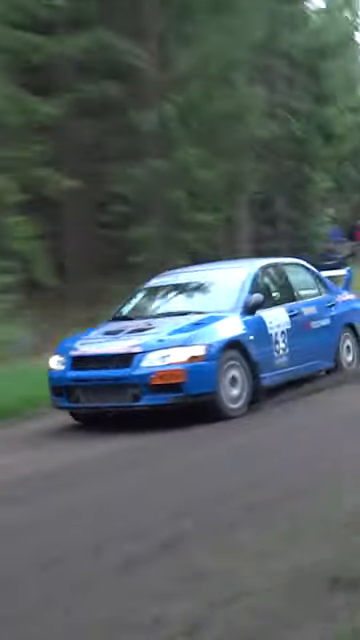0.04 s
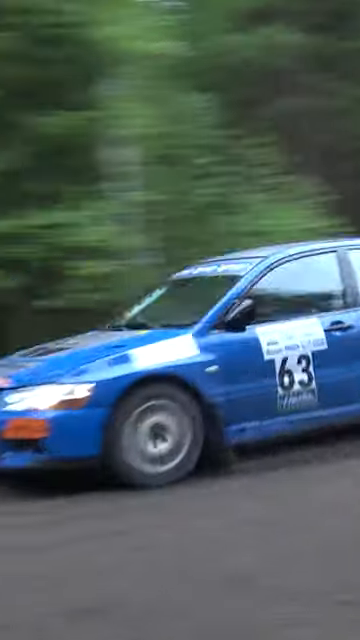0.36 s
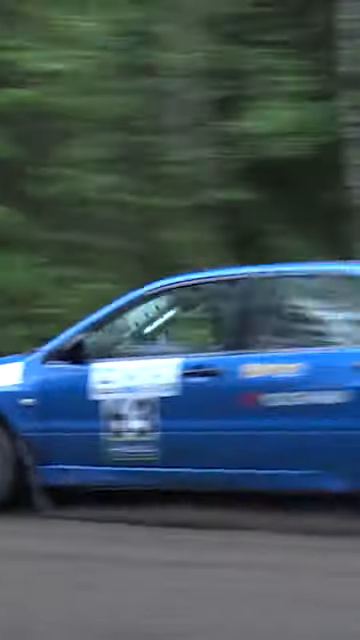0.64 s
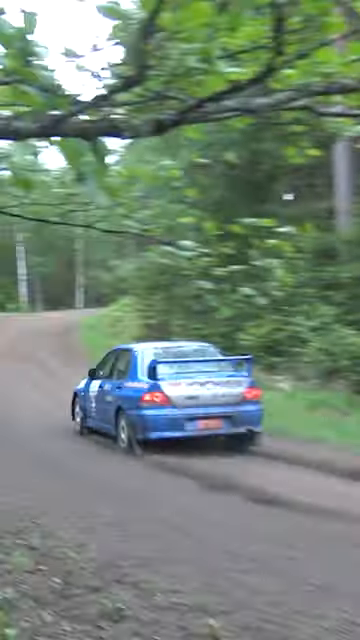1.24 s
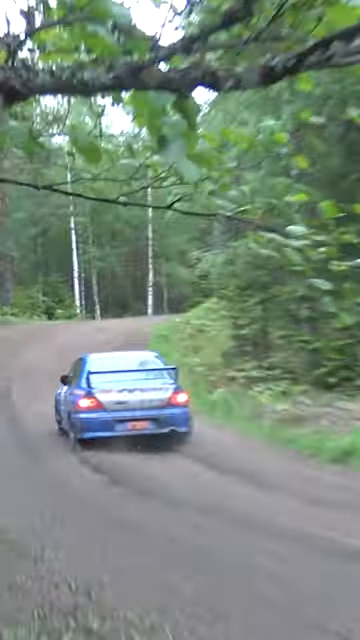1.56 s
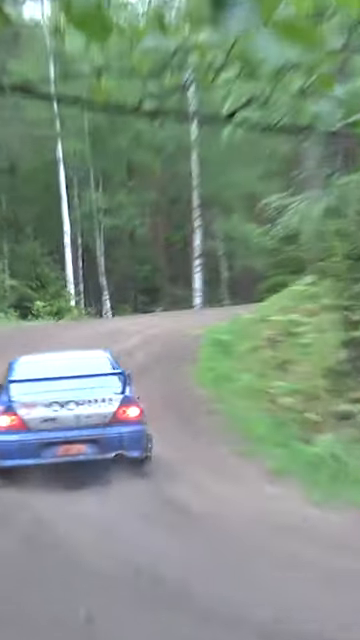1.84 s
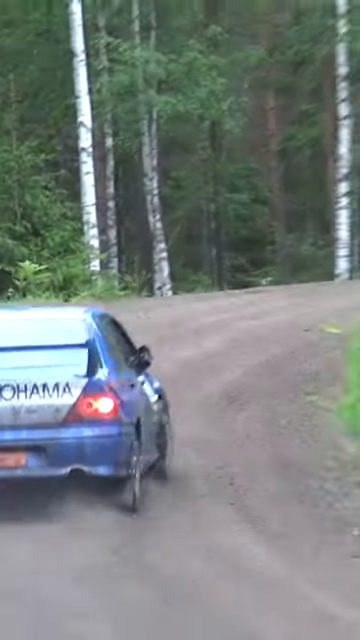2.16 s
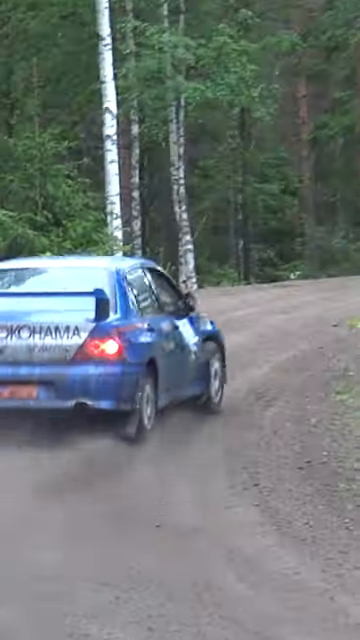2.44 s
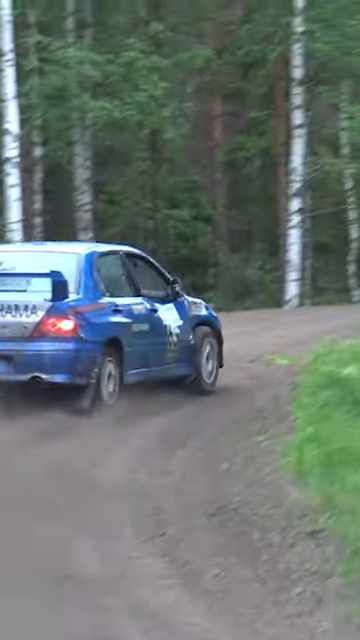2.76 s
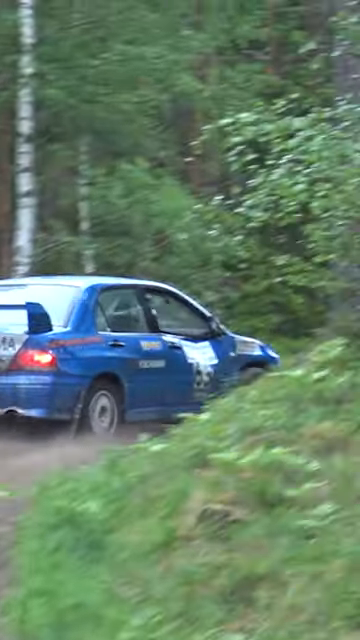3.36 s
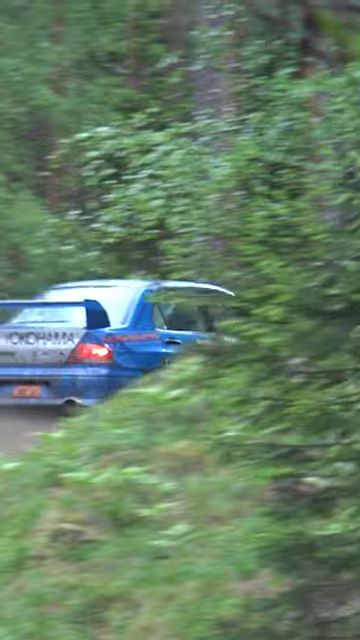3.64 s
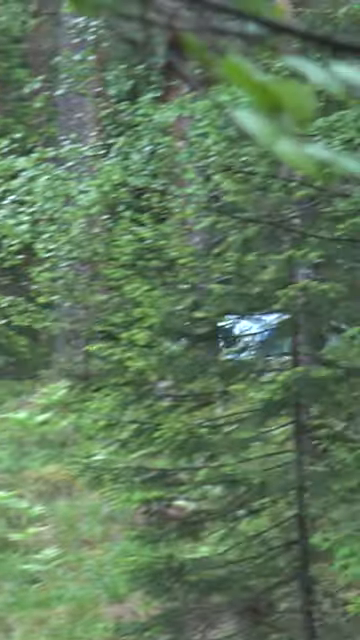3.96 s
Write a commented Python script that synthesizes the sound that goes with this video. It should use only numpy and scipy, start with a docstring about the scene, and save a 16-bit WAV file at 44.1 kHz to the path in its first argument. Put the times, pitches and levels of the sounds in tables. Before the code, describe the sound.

Close by on a forest gravel track, a turbocharged rally car growls past, hissing, chirping and spraying grit. It accelerates away, lifts for a bend with soft pops and tyre scrub, then powers on further off.

```python
"""A gravel forest road: a turbocharged four-cylinder rally car passes close, pulls away, lifts for a
bend and accelerates out. The engine bay is heard as it nears; once past, its firings ring the exhaust
pipe, which pops off throttle. The turbo whistles, blows off and chirps. Tyres crunch and spray gravel
and scrub in the bend, a few stones tick, and the trees give a short echo."""
import sys
import numpy as np
from scipy import signal
from scipy.fft import rfft, irfft
from scipy.io import wavfile
from scipy.ndimage import uniform_filter1d

SR = 44100
rng = np.random.default_rng(int(sys.argv[2]) if len(sys.argv) > 2 else 0)


def bounce(signal):
    """Save signal as a 16-bit WAV file at the path given by the first command-line argument."""
    frames = np.transpose(np.atleast_2d(signal))
    limited = np.clip(frames, -1, 1)
    pcm = np.round(limited * 32767).astype(np.int16)
    wavfile.write(sys.argv[1], SR, pcm)


N = 176400
T = np.arange(N) / SR
LIFT_S, SECOND_LIFT_S = 0.222, 1.93


def firings(jitter=.08):
    """One pulse per firing, uneven by cylinder and by chance; also the phase in firing periods."""
    # time_s, rate_hz
    firing_rate = [(0, 152.9), (.08, 166.1), (.3, 166.1), (.44, 158.1), (.5, 159), (.58, 119.3),
                   (.78, 119.9), (.845, 125.3), (.9, 120.8), (1.3, 133.6), (1.62, 138.2), (1.73, 142.5),
                   (1.87, 138.9), (1.94, 119.3), (2.02, 114), (2.16, 122.4), (2.3, 114), (2.67, 105.1),
                   (3, 110.2), (3.13, 114.7), (3.3, 111.2), (3.4, 115.1), (3.55, 114.5), (3.72, 119.2),
                   (3.79, 127.9), (3.91, 130.4), (4, 126.1)]
    # time_s, random_scatter, cylinder_pattern_depth
    unevenness = [(0, .07, .6), (.5, .05, .5), (.7, .045, .7), (1.2, .03, 1), (1.88, .03, 1), (2, .25, .5),
                  (2.3, .13, .2), (2.6, .2, .5), (2.8, .11, 1.4), (3.5, .075, 1.1), (3.8, .05, .8)]
    # in firing order, at depth 1: size_change, lag_periods
    cylinders = np.array([(-0.27, 0.039), (-0.46, -0.024), (-0.34, 0.0088), (-0.4, -0.036)])
    phase = np.cumsum(curve(firing_rate)) / SR
    count = np.arange(1, int(phase[-1]))
    size_draw, lag_draw = rng.standard_normal((1000, 2))[count].T
    scatter, depth = (np.interp(count, phase, curve(unevenness, column)) for column in (1, 2))
    size_change, lag = cylinders[count % len(cylinders)].T
    fire_phase = count + depth * lag + jitter * scatter * lag_draw
    position = np.interp(fire_phase, phase, np.arange(N) - 1.)
    size = np.maximum(1 + depth * size_change + scatter * size_draw, 0)
    pulses, sample = np.zeros(N), position.astype(int)
    np.add.at(pulses, sample, size * (1 - position + sample))  # split between two samples
    np.add.at(pulses, sample + 1, size * (position - sample))
    return pulses - uniform_filter1d(pulses, 2048), phase


def exhaust(pulses, phase, gas_db=-26, puff_periods=.22, lope_depth=.3):
    """Firings and gas puffs ring the pipe, fuller under load; every other puff is harder."""
    # time_s, level_db
    pipe_level = [(0, -28), (.3, -35), (.38, -30.5), (.45, -29.5), (.55, -19.5), (1, -17), (1.5, -14),
                  (1.85, -15), (1.9, -15.5), (1.912, -32.5), (2.2, -33), (2.46, -31.5), (2.53, -32.5),
                  (2.57, -32), (2.72, -27.5), (2.75, -22), (3.1, -19), (3.58, -19.5), (3.72, -15.5),
                  (4, -17)]
    # pipe response under load: freq_hz, gain_db
    loaded_pipe = [(40, -62), (80, -29), (115, -3), (145, -2.5), (185, -1), (255, 4.5), (300, 5.5),
                   (350, 4.5), (410, -1), (470, -9.5), (540, -8), (620, -26), (900, -35.5), (1300, -55),
                   (8000, -74)]
    # on a light throttle: freq_hz, gain_db
    light_pipe = [(40, -61), (80, -20), (112, 2), (160, -1), (190, -14), (225, 7.5), (280, 7), (330, 6.5),
                  (400, -7), (480, -1.5), (550, -19), (640, -37), (1000, -20), (2500, -53), (8000, -70)]
    # time_s, opening_fraction
    throttle = [(0, 0.73), (.5, 0.47), (.65, 0.76), (1, 0.87), (1.9, 0.98), (1.93, 0.21), (2.7, 0.06),
                (3.2, 0.72), (3.6, 0.4), (3.8, 0.45)]
    load = curve(throttle)
    lope = 1 + lope_depth * np.cos(np.pi * np.round(phase))
    puffs = unit(noise() * np.exp(-(phase % 1) / puff_periods) * lope)
    drive = unit(pulses) + undb(gas_db) * puffs
    pipe = unit(load * colour(drive, loaded_pipe) + (1 - load) * colour(drive, light_pipe))
    return behind_bank(pipe) * undb(curve(pipe_level)) + boom(pipe) + rasp(pulses * lope, puffs)


def rasp(pulses, puffs, pulse_db=4, width_hz=720):
    """Gas rasps after each firing and rings brightly when the tailpipe points this way."""
    # time_s, level_db
    rasp_level = [(0, -46), (.5, -33.5), (.75, -36.5), (1, -34), (1.6, -34), (1.72, -41), (1.9, -42),
                  (1.95, -68), (2.7, -53), (4, -59)]
    # freq_hz, gain_db
    rasp_colour = [(80, -89), (620, -1), (850, 8.5), (1050, 7), (1300, 3), (1650, -0.5), (2300, -8),
                   (2900, -12), (4000, -14.5), (8000, -26), (15000, -52)]
    # start_s, end_s, level_db, pitch_hz
    tailpipe_rings = [(.76, 1.036, -39.5, 2790), (1.47, 1.583, -38, 1650), (3.6, 4, -52, 2900)]
    buzz = puffs + undb(pulse_db) * unit(pulses)
    bright = sum(ring(buzz, hz, width_hz) * undb(db) * swell(start_s, .1, end_s, 0.032)
                 for start_s, end_s, db, hz in tailpipe_rings)
    return colour(buzz, rasp_colour) * undb(curve(rasp_level)) + bright


def boom(pipe, overrun_db=-34):
    """The lowest engine note swells as the car comes by and burbles up on the overrun."""
    # time_s, level_db
    boom_level = [(0, -20.5), (.12, -52), (.18, -21.5), (.235, -28), (.3, -24), (.41, -23), (.63, -29),
                  (1, -75)]
    note_phase = np.angle(signal.hilbert(lowpass(pipe, 175)))
    overrun = undb(overrun_db) * swell(2.05, 0.12, 2.18, 0.041)
    return np.sqrt(2) * np.cos(note_phase) * (undb(curve(boom_level)) + overrun)


def behind_bank(pipe, hidden_s=3.7, shade_hz=450):
    """A grassy bank hides the tailpipe and shades its upper partials."""
    hidden = np.clip((T - hidden_s) / 0.091, 0, 1)
    return pipe + hidden * (lowpass(pipe, shade_hz) - pipe)


def afterfire(pitch_hz=290, rise_s=0.0025):
    """Soft pops ring the pipe off throttle."""
    # start_s, peak_db
    pops = [(2.057, -17), (2.08, -14.5), (2.129, -20.5)]
    out = np.zeros(N)
    for start_s, db in pops:
        age = np.maximum(T - start_s, 0) / rise_s
        out += undb(db) * age * np.exp(1 - age) * np.sin(2 * np.pi * pitch_hz * (T - start_s))
    return out


def engine_bay(pulses, phase, clatter_db=-9, body_db=-3, growl_db=2):
    """Mechanical clatter and, until the first lift, intake growl, both thrown forwards."""
    # time_s, level_db
    bay_level = [(0, -37), (.1, -23.5), (.225, -34), (.24, -37), (.37, -31), (.47, -28), (.65, -50),
                 (1, -85)]
    # freq_hz, gain_db
    bay_colour = [(100, -5), (330, -2), (500, 1.5), (640, -17), (800, 3.5), (930, -6.5), (1050, 10.5),
                  (1250, -8), (1600, -12.5), (1900, 2.5), (2300, -22), (3000, -9.5), (3700, -24),
                  (4400, -8.5), (15000, -61)]
    # firing_rate_multiple, relative_db
    growl_partials = [(2, 0), (2.5, -7), (3, -11), (6, -12), (6.5, -10)]
    gain = undb(curve(bay_level) + .5 * walk(40))
    growl = sum(undb(db) * np.sin(2 * np.pi * multiple * phase) for multiple, db in growl_partials)
    growl *= undb(growl_db) * swell(-0.2, .1, LIFT_S, 0.0073)
    body = colour(unit(pulses) + undb(clatter_db) * noise(), bay_colour)
    return (undb(body_db) * body + growl) * gain


def turbo(whistle_hz=13600, sag_hz=400, whistle_db=-40, boost_db=-44):
    """Whistle on the approach, a two-spurt blow-off at the lift, then boost hiss from the tailpipe."""
    approach = np.minimum(T / LIFT_S, 1)
    pitch_hz = whistle_hz - sag_hz * approach ** 2 + 260 * walk(1200)
    whistle = tone(pitch_hz) * undb(whistle_db)
    whistle += resonance(resonance(noise(), 4480, 200), 4490, 200) * undb(-34.5) * approach
    whistle *= swell(-.05, 0.055, LIFT_S, 0.018)
    air = colour(noise(), [(1500, -51), (2600, -9), (3400, -9), (6000, 10.5), (8000, 14),
                           (11500, 11), (14000, 0), (16000, -34)])
    spurts = undb(-22) * swell(LIFT_S - .01, 0.025, 0.24, 0.13)
    spurts += undb(-28) * swell(0.364, .01, 0.375, 0.011)
    boost = resonance(resonance(noise(), 4600, 1500), 4600, 3792)
    boost *= undb(boost_db) * swell(0.8, 0.36, SECOND_LIFT_S, 0.018)
    return whistle + air * spurts + boost


def compressor_surge(fall_hz_per_s=8000, hold_s=0.036, flutter_hz=110):
    """Air surges back through the compressor in rough falling chirps."""
    # start_s, level_db, start_hz
    chirps = [(.24, -30, 2780), (.377, -25, 2530)]
    out = np.zeros(N)
    for start_s, db, start_hz in chirps:
        fall_hz = fall_hz_per_s * np.clip(T - start_s, 0, 2 * hold_s)
        chirp = tone(start_hz - fall_hz + flutter_hz * walk(900))
        roughness = 1 + 0.25 * walk(300)
        out += chirp * roughness * undb(db) * swell(start_s, 0.01, start_s + hold_s, 0.036)
    return out


def air_gulps():
    """Hoarse gulps of air around the first lift."""
    # start_s, end_s, level_db
    gulps = [(0.174, 0.219, -22), (0.295, 0.361, -22.5)]
    air = colour(noise(), [(200, -19), (480, -1), (640, -25), (780, 4), (1250, 4), (1700, -0.5),
                           (2600, -8), (9000, -40)])
    return air * sum(undb(db) * swell(start_s, 0.024, end_s, 0.01) for start_s, end_s, db in gulps)


def gravel(waver_db=.7):
    """Tyres crunch stones, scatter grit and spray sand; the road rumbles."""
    # time_s, crunch_db, grit_db, spray_db
    tyre_levels = [(0, -20.5, -34.5, -36), (.2, -25, -32.5, -32), (.3, -31, -29, -34.5),
                   (.45, -24.5, -33.5, -30), (.55, -25.5, -37, -36), (.8, -31, -41.5, -40.5),
                   (1.1, -33.5, -43, -46), (1.9, -35, -48, -48.5), (2.3, -37.5, -53.5, -54.5),
                   (3, -36.5, -51.5, -56), (3.45, -36, -48, -50), (3.75, -34, -47.5, -59.5)]
    # time_s, level_db
    rumble_level = [(0, -38.5), (.45, -24), (.7, -34.5), (2.5, -41), (3.3, -38.5), (4, -31)]
    # four spectra: freq_hz, gain_db
    crunch_colour = [(30, -28), (400, 10), (650, -4.5), (850, -3.5), (1600, -5.5), (2200, -11),
                     (3200, -20.5), (8000, -48)]
    grit_colour = [(1200, -11), (2500, 1.5), (3200, 2), (4000, 2.5), (4600, -2), (5100, 1), (5800, -8.5),
                   (8000, -13.5), (15000, -47)]
    spray_colour = [(3000, -37), (5500, 2.5), (7500, 5), (10000, 1.5), (12500, -2.5), (14000, -16.5),
                    (16000, -1)]
    rumble_colour = [(20, -25), (65, -10), (120, -4), (250, 4), (600, -33.5), (3000, -55)]
    crunch = colour(grains(9000, spread_db=.6), crunch_colour)
    crunch *= undb(curve(tyre_levels, 1) + waver_db * walk(34))
    grit = colour(grains(6000, spread_db=.93), grit_colour)
    grit *= undb(curve(tyre_levels, 2) + waver_db * walk(27))
    spray = dull_with_distance(colour(grains(6900, spread_db=.93), spray_colour))
    spray *= undb(curve(tyre_levels, 3) + waver_db * walk(37))
    rumble = colour(noise(), rumble_colour) * undb(curve(rumble_level))
    return crunch + grit + spray + rumble


def dull_with_distance(spray, pass_s=0.44, pass_width_s=0.46, far_share=0.43, cutoff_hz=8550):
    """The spray is brightest as the car passes, duller far off."""
    freq_hz = np.arange(N // 2 + 1) * SR / N
    dull = unit(irfft(rfft(spray) / (1 + (freq_hz / cutoff_hz) ** 6), N))
    nearness = np.exp(-((T - pass_s) / pass_width_s) ** 2)
    return spray + far_share * (1 - nearness) * (dull - spray)


def tyre_scrub(pitch_hz=1850, width_hz=550, level_db=-46):
    """Tyres rasp in fits as the car slides into the bend."""
    scrub = ring(noise(), pitch_hz, width_hz)
    return scrub * undb(level_db + 2 * walk(40)) * swell(2.058, 0.022, 2.46, 0.035)


def stones(decay_s=0.0026, patter_db=-55):
    """Flung stones tick against the car; smaller ones patter on the road."""
    # start_s, relative_db, pitch_hz
    ticks = [(1.055, -19, 6954), (2.81, -47, 7480), (2.868, -28.5, 4004), (2.94, -43, 8995),
             (3.153, -26, 6810)]
    out = colour(grains(250, spread_db=1.2), SPRAY_COLOUR) * undb(patter_db)
    for start_s, db, hz in ticks:
        out += ring(noise(), hz, 3200) * undb(db) * swell(start_s, 0.0023, start_s, decay_s) / 2
    return signal.sosfilt(signal.butter(2, 11000, fs=SR, output="sos"), out)


def forest(x, t60_s=.55, echo_db=-19):
    """Trunks scatter a short, dull echo."""
    tail = noise() * undb(-60 * T / t60_s) * np.clip((T - .015) / .03, 0, 1)
    tail /= np.sqrt(np.sum(tail ** 2))
    tail = signal.lfilter(*signal.butter(1, 5000, fs=SR), tail)
    return x + undb(echo_db) * signal.fftconvolve(x, tail)[:N]


def undb(db):
    """Decibels to gain."""
    return 10 ** (np.asarray(db) / 20)


def curve(table, column=1):
    """One column of a time table, linearly interpolated."""
    rows = np.array(table, float)
    return np.interp(T, rows[:, 0], rows[:, column])


def unit(x):
    """Scale to rms 1."""
    return x / np.std(x)


def noise():
    """White noise."""
    return rng.standard_normal(N)


def tone(pitch_hz):
    """Sine along a pitch curve."""
    return np.sin(2 * np.pi * np.cumsum(pitch_hz) / SR)


def walk(rate_hz):
    """Smooth random drift; rms 1."""
    span = int(SR / rate_hz)
    return unit(uniform_filter1d(uniform_filter1d(noise(), span), span))


def grains(rate_hz, spread_db):
    """Random clicks of unequal size."""
    clicks = (rng.random(N) < rate_hz / SR) * noise()
    return clicks * undb(spread_db * np.minimum(rng.exponential(size=N), 5))


def swell(start_s, attack_s, end_s, release_s):
    """Linear rise, hold, exponential fall."""
    return np.clip((T - start_s) / attack_s, 0, 1) * np.exp(-np.maximum(T - end_s, 0) / release_s)


def colour(x, points, size=8192):
    """Minimum-phase filter through (freq_hz, gain_db) points; rms 1."""
    hz, db = np.array(points, float).T
    bins_hz = np.maximum(np.arange(size // 2 + 1) * SR / size, 1)
    gain = undb(np.interp(np.log(bins_hz), np.log(hz), db))
    cepstrum = irfft(np.log(gain))
    cepstrum[1:size // 2] *= 2
    cepstrum[size // 2 + 1:] = 0
    impulse = irfft(np.exp(rfft(cepstrum)))
    return unit(signal.fftconvolve(x, impulse)[:N])


def resonance(x, hz, width_hz):
    """One resonance; rms 1."""
    return unit(signal.lfilter(*signal.iirpeak(hz, hz / width_hz, fs=SR), x))


def ring(x, hz, width_hz):
    """Two equal resonances in series, each width_hz wide."""
    return resonance(resonance(x, hz, width_hz), hz, width_hz)


def lowpass(x, hz):
    """Steep zero-phase low-pass."""
    return signal.sosfiltfilt(signal.butter(6, hz, fs=SR, output="sos"), x)


def scene():
    """The car and the gravel among the trees."""
    pulses, phase = firings()
    car = exhaust(pulses, phase) + engine_bay(pulses, phase) + afterfire()
    car += turbo() + compressor_surge() + tyre_scrub() + air_gulps()
    return forest(car + gravel() + stones())[None]


def record(dry, cutoff_hz=15600):
    """Steep cut of the top treble."""
    return signal.sosfilt(signal.ellip(10, .2, 80, cutoff_hz, fs=SR, output="sos"), dry)


# sand and small stones: freq_hz, gain_db
SPRAY_COLOUR = [(3000, -37), (5500, 2.5), (7500, 5), (10000, 1.5), (12500, -2.5), (14000, -16.5),
                (16000, -1)]

dry = scene()
out = record(dry)
bounce(out)
```